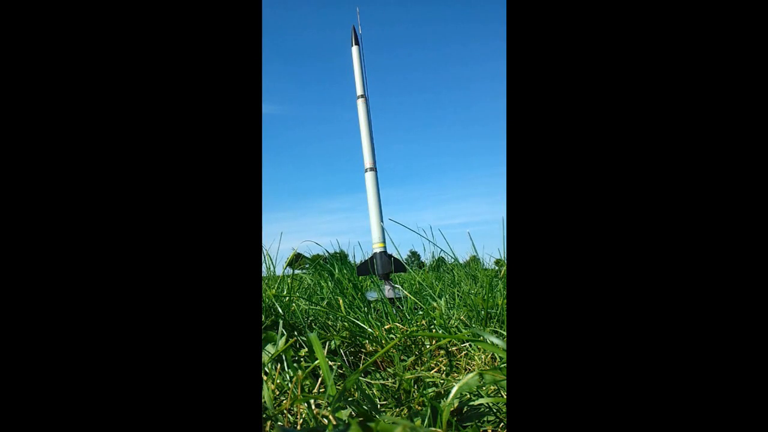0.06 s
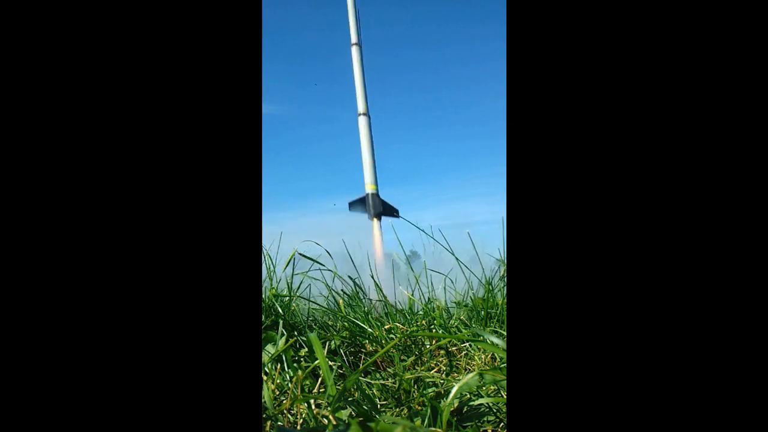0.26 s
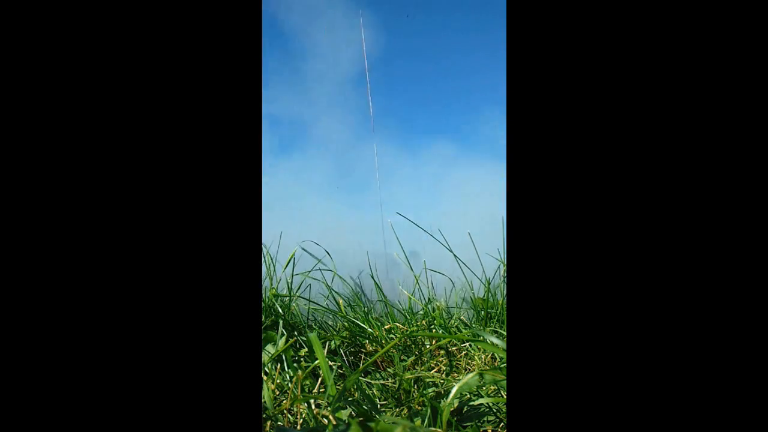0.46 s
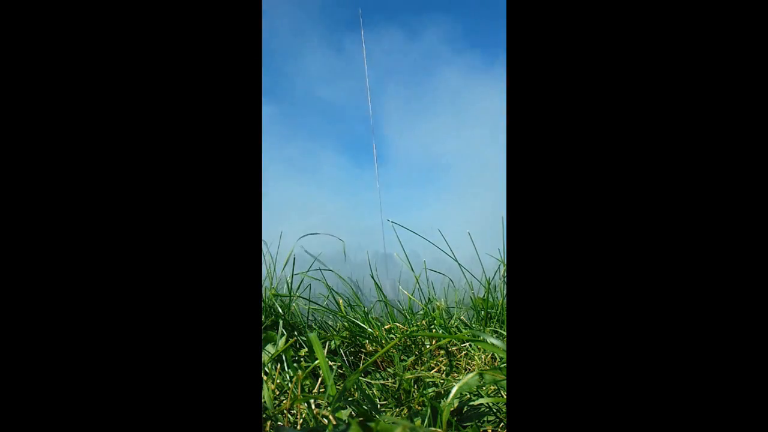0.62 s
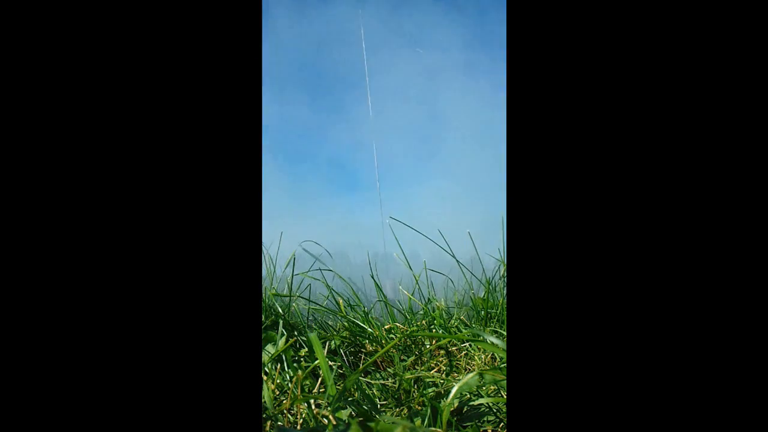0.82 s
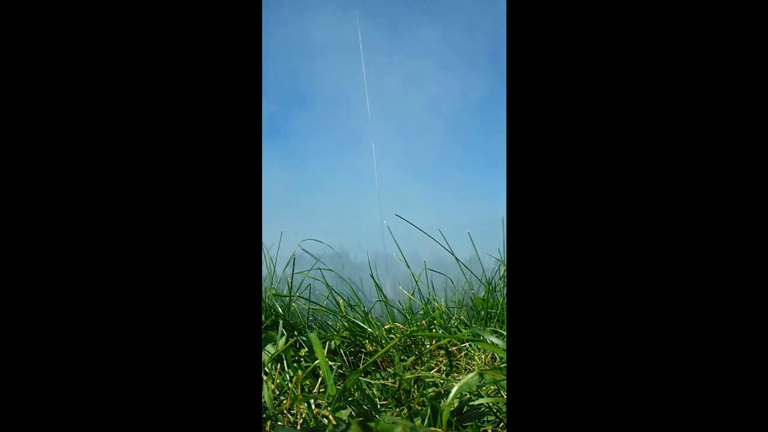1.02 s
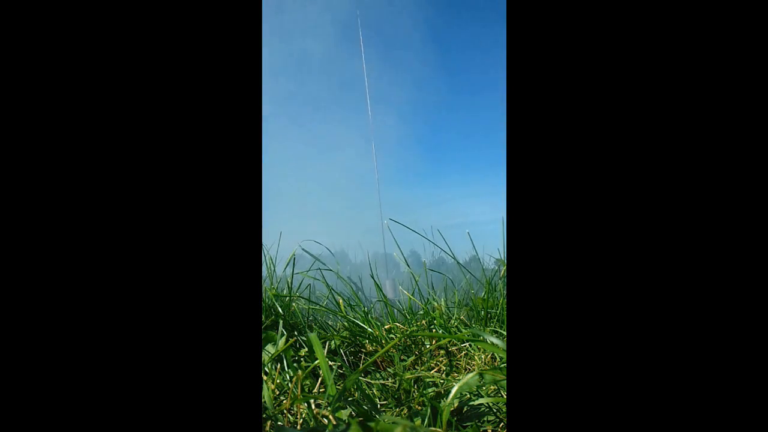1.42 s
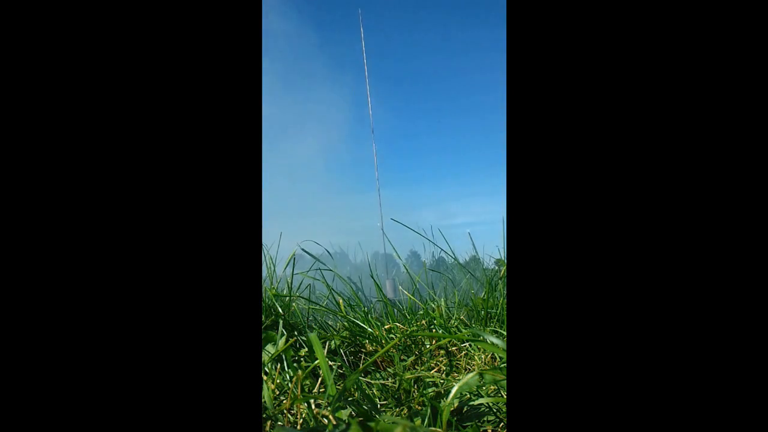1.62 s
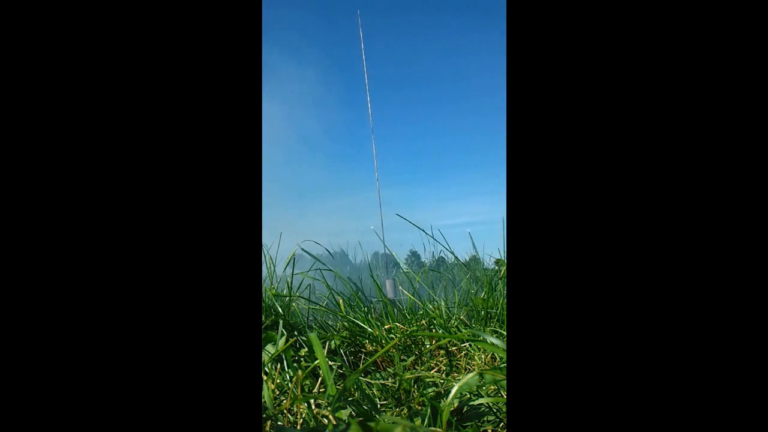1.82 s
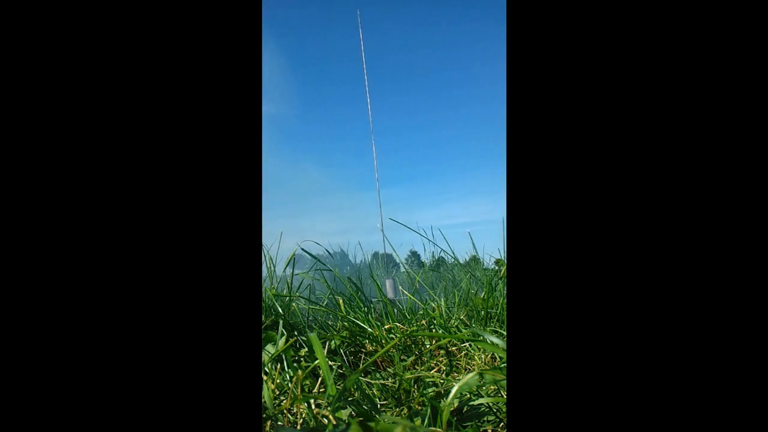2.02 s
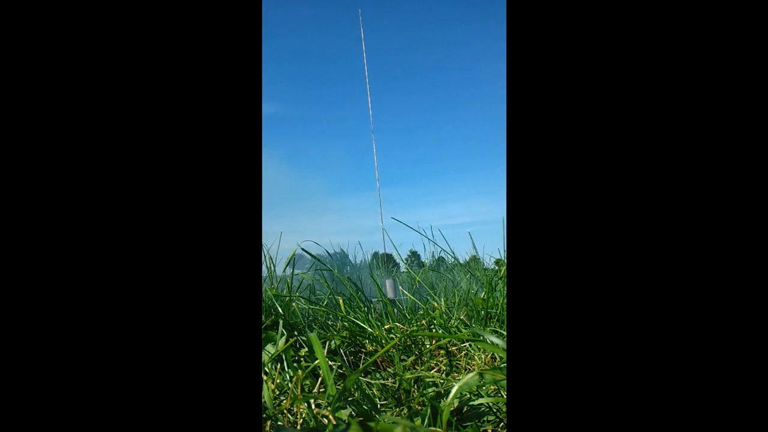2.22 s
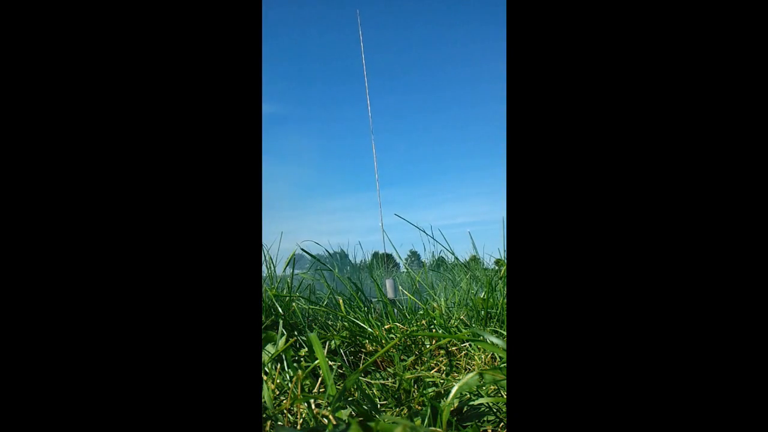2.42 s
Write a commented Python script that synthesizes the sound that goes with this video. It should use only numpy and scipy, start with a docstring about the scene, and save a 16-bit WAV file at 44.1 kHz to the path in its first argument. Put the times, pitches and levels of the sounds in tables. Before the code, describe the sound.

A model rocket starts with two faint ticks and a thin fizz. At 0.2 seconds it catches with a loud, bright hiss, close and slightly overloaded. Around 0.5 seconds it rushes upward with a brief low rumble, and the roar peaks near 0.8. It recedes, crackling more, with two small pops around 1.2 seconds. At 2.3 it cuts off, leaving a faint echo over the quiet field.

```python
"""Two faint ticks and a thin fizz: an igniter lights a model rocket beside a microphone in the grass.
The motor catches with a bright hiss on the pad, then climbs away and burns out. Turbulent mixing
makes the jet's roar and hiss, and random shocks make it crackle. Interference with the ground
reflection sweeps down as the rocket lifts. The recorder overloads while the motor is near,
and a faint echo hangs over the field."""
import sys
import numpy as np
from scipy import signal
from scipy.fft import rfft, irfft, next_fast_len
from scipy.io import wavfile

SR = 44100
rng = np.random.default_rng(int(sys.argv[2]) if len(sys.argv) > 2 else 0)


def materialize(psi):
    """Save the field psi as 16-bit PCM at rate SR to the path in sys.argv[1].

    A 1-D psi becomes a single channel; in a 2-D psi each row is a channel.
    """
    bounded = np.clip(np.atleast_2d(psi).T, -1, 1)
    quanta = np.round(bounded * 32767).astype(np.int16)
    wavfile.write(sys.argv[1], SR, quanta)


N = 112454
CUTOFF_HZ = 15700


def flight_jet():
    """Jet noise: turbulence and one train of shocks feed roar and hiss, which end together at burnout."""
    # plume roar, nozzle hiss, rush of the passing plume: (time [s], level [dB])
    roar_level = [(0.42, -53), (0.52, -17.5), (0.62, -21), (0.74, -12), (0.82, -10), (0.93, -15.5),
                  (1.06, -15.5), (1.13, -17.5), (1.32, -18), (1.52, -21.5), (1.68, -21.5), (1.85, -25.5),
                  (2.1, -25.5), (2.26, -25.5)]
    hiss_level = [(0.42, -26), (0.5, -17), (0.58, -19.5), (0.7, -10.5), (0.81, -11), (0.92, -14),
                  (1.02, -15.5), (1.2, -19), (1.45, -26), (1.75, -28), (2.0, -25), (2.24, -23)]
    rush_level = [(0.44, -33.5), (0.49, -20), (0.54, -12), (0.68, -14), (0.8, -18), (0.95, -22),
                  (1.25, -44.5), (1.6, -60)]
    # their spectra: (frequency [Hz], level [dB])
    roar_colour = [(40, -32.5), (100, -26.5), (220, -16.5), (450, -9), (800, -3), (1250, 1.5), (1600, -3),
                   (2100, -11), (3000, -14.5), (8000, -52.5)]
    hiss_colour = [(800, -19.5), (2000, -25.5), (2450, -3), (2750, -6), (3250, 4.5), (4000, 3.5),
                   (4900, -2), (5600, -12), (6200, -8), (6600, -12.5), (7100, -15.5), (8000, -19.5),
                   (10300, -14.5), (14000, -31)]
    rush_colour = [(300, -13), (1100, -2), (2000, 1), (2900, 1.5), (3700, -10.5), (4550, 3), (5200, -5),
                   (5950, -1.5), (7000, -6), (7600, 2.5), (8500, -16), (14000, -6)]
    # shocks relative to the smooth roar: (time [s], level [dB])
    crackle_level = [(0.5, -15), (1.1, -9.5), (1.45, -1.5), (1.9, -4), (2.25, -1.5)]
    shocks_per_s, spread_db, hiss_crackle_db = 700, 0.5, -6.5
    burnout_s, taper_db_per_s = 2.257, 127
    flameout_s, flameout_db_per_s = 2.325, 328
    sizes = from_db(spread_db * np.minimum(rng.exponential(1, N), 3.5))
    shocks = rms_one((rng.random(N) < shocks_per_s / SR) * sizes)
    crackle = from_db(in_time(crackle_level))
    shocks = (shocks - shocks.mean()) * crackle
    roar = (turbulence(flutter_db=1.63, rate_hz=49) + shocks) / np.sqrt(1 + crackle ** 2)
    hiss = turbulence(flutter_db=0.33, rate_hz=82) + from_db(hiss_crackle_db) * shocks
    jet = level(roar_level) * coloured(roar, roar_colour)
    jet += level(hiss_level) * coloured(hiss, hiss_colour)
    jet += level(rush_level) * noise(rush_colour)
    taper_db = taper_db_per_s * np.maximum(seconds() - burnout_s, 0)
    flameout_db = flameout_db_per_s * np.maximum(seconds() - flameout_s, 0)
    return jet * from_db(-taper_db - flameout_db)


def pad_jet():
    """Turbulent mixing on the pad: a thin fizz fills out to a full hiss as the propellant catches."""
    # jet on and just above the pad: (time [s], level [dB])
    pad_level = [(0.07, -74), (0.11, -48.5), (0.16, -51), (0.2, -47), (0.24, -19.5), (0.28, -15),
                 (0.32, -11.5), (0.36, -7.5), (0.385, -15.5), (0.41, -11), (0.48, -9.5), (0.54, -23),
                 (0.62, -18), (0.75, -22.5), (1.3, -83)]
    # its spectrum: (frequency [Hz], level [dB])
    pad_colour = [(60, -9), (200, -13.5), (600, -4), (1200, 3), (1700, 4.5), (2500, -5), (3150, 1.5),
                  (3900, -4), (4600, 2.5), (6200, 1), (7200, 2), (8000, -5.5), (14000, -10)]
    catch_s, rise_s, fizz_edge_hz = 0.2, 0.022, 4300
    jet = coloured(turbulence(flutter_db=1.6, rate_hz=59), pad_colour)
    fizz = signal.sosfilt(butterworth(2, fizz_edge_hz, "high"), noise(pad_colour))
    caught = 0.5 + 0.5 * np.tanh((seconds() - catch_s) / rise_s)
    return level(pad_level) * (np.sqrt(caught) * jet + np.sqrt(1 - caught) * fizz)


def chuffs():
    """Unsteady combustion: uneven burning radiates short puffs of noise."""
    # puffs: (time [s], level [dB])
    puffs = [(0.2418, -14), (1.170, -14), (1.266, -14.5), (2.24, -15), (2.253, -25)]
    # their spectrum: (frequency [Hz], level [dB])
    puff_colour = [(30, -15), (100, -12.5), (220, 1.5), (600, -8.5), (1300, 4), (2200, -2), (7000, -24.5)]
    return bursts(puffs, puff_colour, decay_s=0.0027)


def thumps():
    """Bipolar pulses: each clump leaving the nozzle gives one push and pull of pressure."""
    # pressure pulses: (time [s], level [dB])
    pulses = [(0.2422, -24), (1.158, -21), (1.2673, -14.5), (2.243, -27.5)]
    width_s = 0.0005
    phases = [((seconds() - s) / width_s, db) for s, db in pulses]
    return sum(from_db(db) * u * np.exp(-u ** 2 / 2) for u, db in phases)


def buffet():
    """Jet impingement: exhaust striking the ground makes a lumpy rumble."""
    # rumble: (time [s], level [dB])
    rumble_level = [(0.22, -64), (0.3, -46), (0.41, -32), (0.475, -19), (0.53, -27), (0.575, -41.5),
                    (0.72, -28), (0.84, -26), (0.95, -41), (1.5, -82.5)]
    # its spectrum: (frequency [Hz], level [dB])
    rumble_colour = [(20, 4.5), (60, -2.5), (130, -7.5), (200, -0.5), (320, -5.5), (700, -13),
                     (2000, -68.5)]
    return level(rumble_level) * coloured(turbulence(flutter_db=1.5, rate_hz=51), rumble_colour)


def igniter():
    """Broadband transients: the igniter ticks twice."""
    # ticks: (time [s], level [dB])
    ticks = [(0.0395, -46), (0.0850, -47.5)]
    # their spectrum: (frequency [Hz], level [dB])
    tick_colour = [(200, -1), (1200, -2), (2200, -2), (3600, 2), (4800, -1), (5800, -9), (7500, -14)]
    return bursts(ticks, tick_colour, decay_s=0.004)


def over_ground(x):
    """Comb filtering: the reflection lags more as the rocket rises, so the notches sweep down."""
    # ground reflection: (time [s], lag [ms], strength [0-1])
    reflection = [(0.285, 0.19, 0.63), (0.32, .198, 0.3), (0.44, .2, 0.27), (0.48, 0.2, 0.34),
                  (0.55, 0.343, 0), (0.62, .3, 0.24), (0.72, 0.42, 0.11), (1.0, 0.69, 0.03)]
    lag_ms, strength = in_time(reflection)
    reflected = np.interp(seconds() - lag_ms / 1000, seconds(), x)
    return (x + strength * reflected) / np.sqrt(1 + strength ** 2)


def field_echo(x):
    """Diffuse scattering: the field and far trees return a faint, exponentially decaying tail."""
    echo_db, t60_s, delay_s = -26.5, 1.6, 0.033
    t = seconds()
    tail = rng.standard_normal(N) * (t > delay_s) * from_db(-60 * t / t60_s)
    tail /= np.sqrt(np.sum(tail ** 2))
    dull = signal.sosfilt(butterworth(1, hz=12000), x)
    return from_db(echo_db) * signal.fftconvolve(dull, tail)[:N]


def open_air():
    """Ambient noise: a steady, low hush over the field."""
    # its spectrum: (frequency [Hz], level [dB])
    air_colour = [(25, -5), (70, 4), (150, 3.5), (350, 0.5), (600, -7), (1200, -12), (2400, -17),
                  (3300, -17.5), (5000, -22), (7000, -22.5), (12000, -45)]
    return from_db(-55.5) * noise(air_colour)


def from_db(db):
    """Decibels to amplitude ratio."""
    return 10 ** (np.asarray(db) / 20)


def rms_one(x):
    """Normalisation to unit rms."""
    return x / np.sqrt(np.mean(x ** 2) + 1e-20)


def seconds():
    """Time of every sample."""
    return np.arange(N) / SR


def in_time(rows):
    """Linear interpolation in time, one curve per column."""
    times, *columns = np.transpose(rows)
    return np.squeeze([np.interp(seconds(), times, column) for column in columns])


def level(rows):
    """Amplitude envelope from (time [s], level [dB]); silent before the first row."""
    return from_db(in_time(rows)) * (seconds() >= rows[0][0])


def butterworth(order, hz, kind="low"):
    """Filter with a maximally flat passband."""
    return signal.butter(order, hz, kind, fs=SR, output="sos")


def coloured(x, colour):
    """Spectral shaping by (frequency [Hz], level [dB]); unit rms."""
    size = next_fast_len(N + SR // 10)
    hz = np.maximum(np.arange(size // 2 + 1) * SR / size, 1)
    points, db = np.transpose(colour)
    gain = from_db(np.interp(np.log(hz), np.log(points), db))
    gain *= hz / (hz + 10) / np.sqrt(1 + (hz / CUTOFF_HZ) ** 16)  # roll off both ends
    return rms_one(irfft(rfft(x, size) * gain, size)[:N])


def noise(colour):
    """Stationary Gaussian noise with a given spectrum."""
    return coloured(rng.standard_normal(N), colour)


def turbulence(flutter_db, rate_hz):
    """Random amplitude modulation: white noise whose strength flutters."""
    white = rng.standard_normal(N)
    hop, settle = 40, 2000
    pole = np.exp(-2 * np.pi * rate_hz * hop / SR)
    kicks = rng.standard_normal(N // hop + settle + 2)
    slow = signal.lfilter([1], [1, -2 * pole, pole ** 2], kicks)[settle:]
    drift = np.interp(np.arange(N) / hop, np.arange(len(slow)), rms_one(slow))
    return rms_one(white * from_db(flutter_db * drift))


def bursts(rows, colour, decay_s):
    """Noise transients with instant onset and exponential decay."""
    t = seconds()
    envelope = sum(from_db(db) * (t >= s) * np.exp(-np.abs(t - s) / decay_s) for s, db in rows)
    return envelope * noise(colour)


def squash(x, size, top, knee):
    """Soft saturation: gain falls as the signal's size nears the top."""
    return x / (1 + (size / top) ** knee) ** (1 / knee)


def scene():
    """Superposition of motor, igniter and open air, the same in both channels."""
    motor = over_ground(pad_jet() + flight_jet() + chuffs()) + thumps()
    air = open_air()
    mono = motor + igniter() + buffet() + field_echo(motor) + air
    return np.array([mono, mono])


def record(dry):
    """Overload and band limiting: an instant limiter, a leaky voice band, rounded peaks, a top cut."""
    low_cut_hz, voice_band_hz, leak_db = 128, 7235, -31.5
    envelope = np.abs(signal.hilbert(dry))
    limited = squash(dry, envelope, top=0.57, knee=4.25)
    limited = signal.sosfiltfilt(butterworth(1, low_cut_hz, "high"), limited)
    narrow = signal.sosfiltfilt(butterworth(12, voice_band_hz), limited)
    narrow += from_db(leak_db) * limited
    rounded = squash(narrow, np.abs(narrow), top=0.54, knee=13)
    top_cut = signal.cheby2(16, 50, CUTOFF_HZ + 400, fs=SR, output="sos")
    return signal.sosfiltfilt(top_cut, rounded)


dry = scene()
out = record(dry)
materialize(out)
```